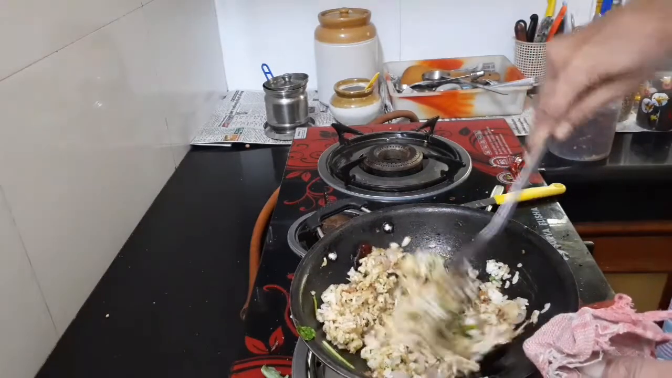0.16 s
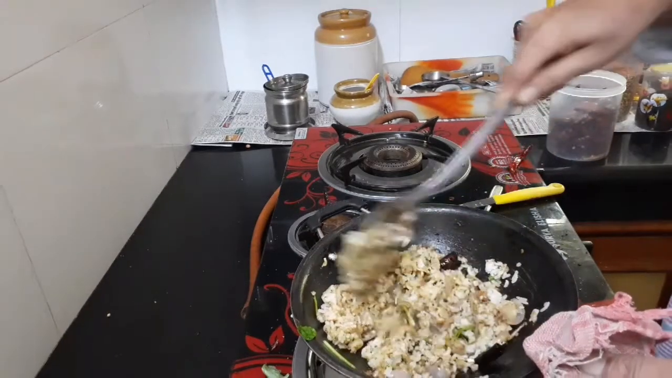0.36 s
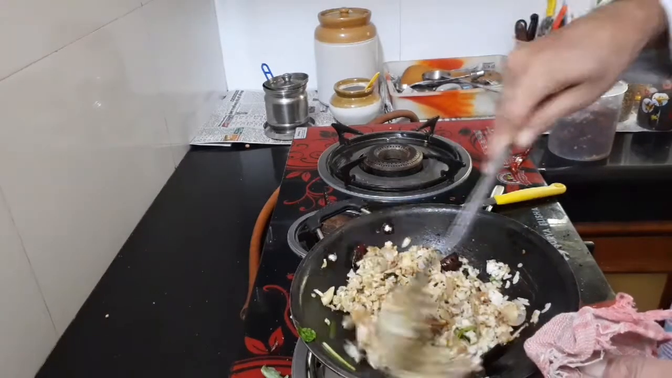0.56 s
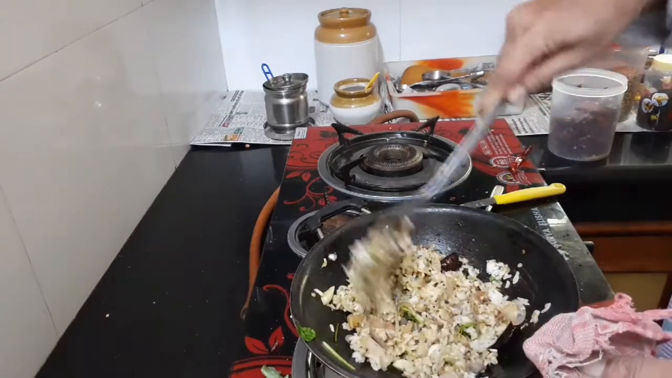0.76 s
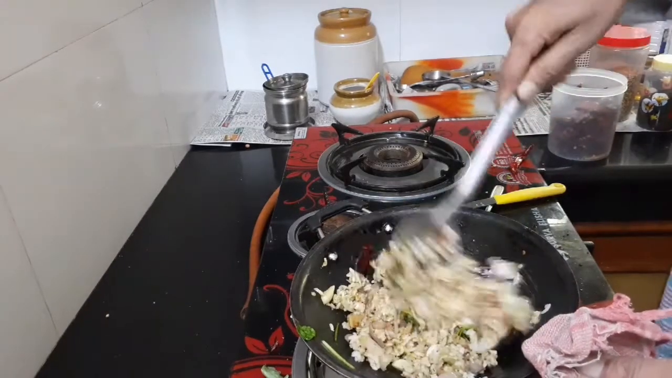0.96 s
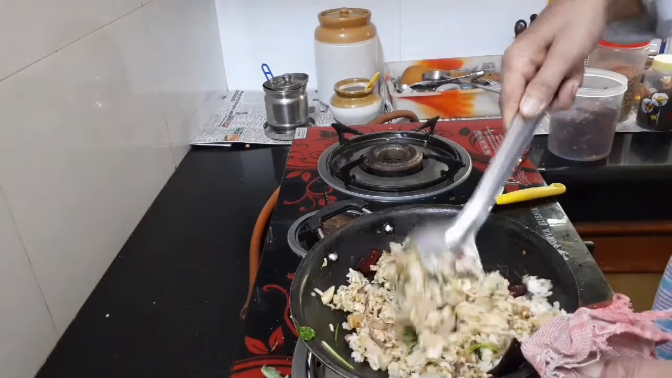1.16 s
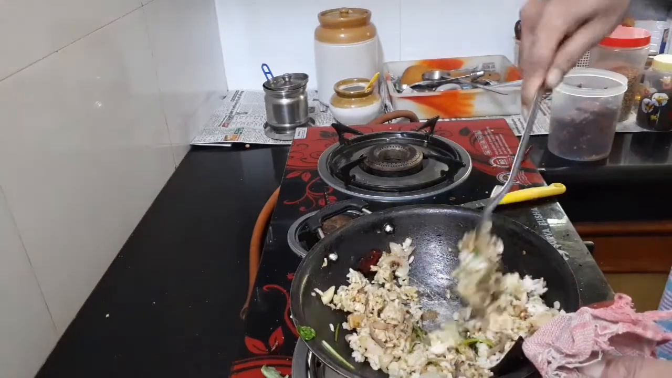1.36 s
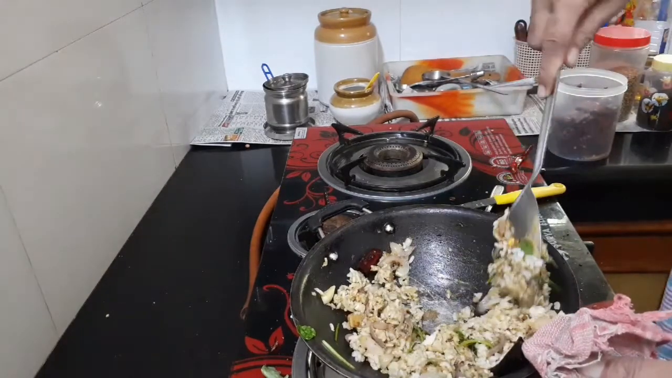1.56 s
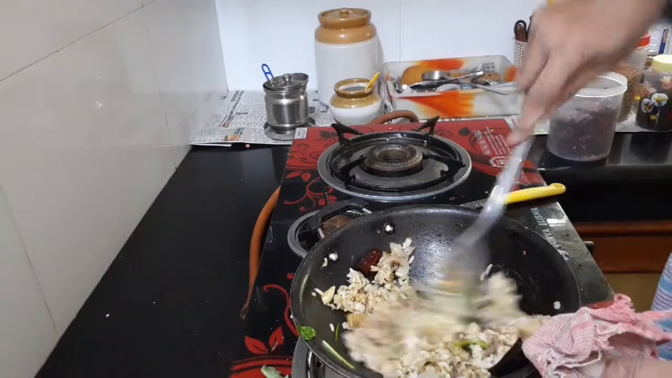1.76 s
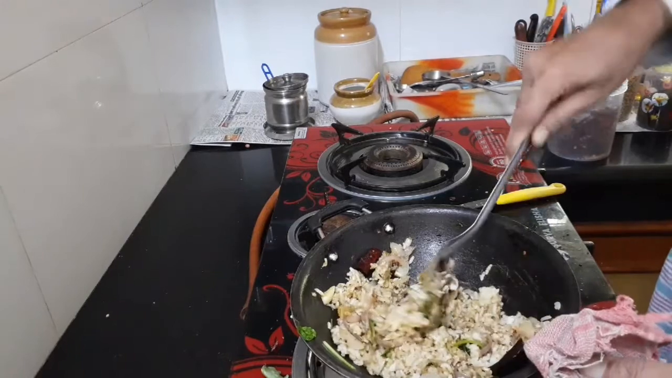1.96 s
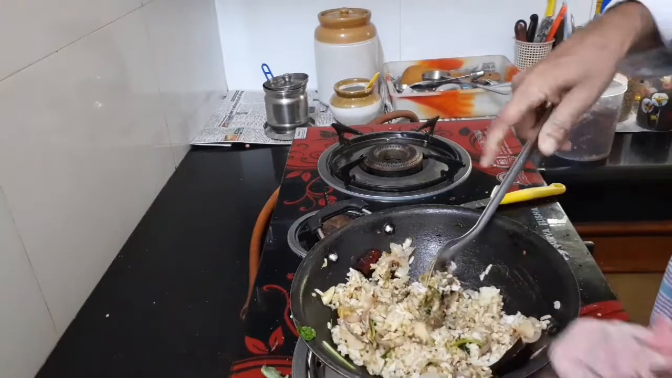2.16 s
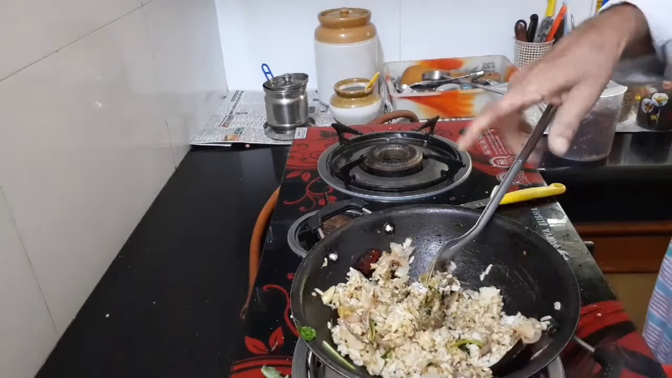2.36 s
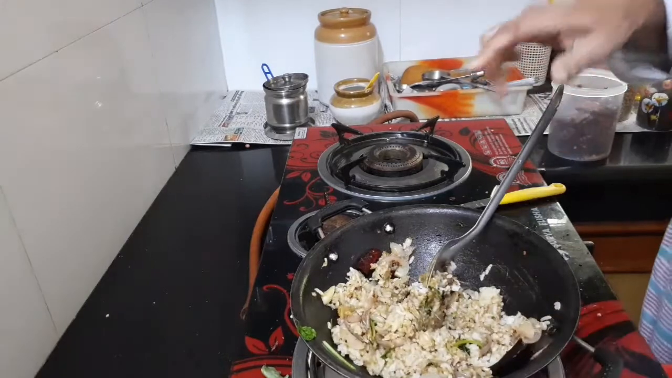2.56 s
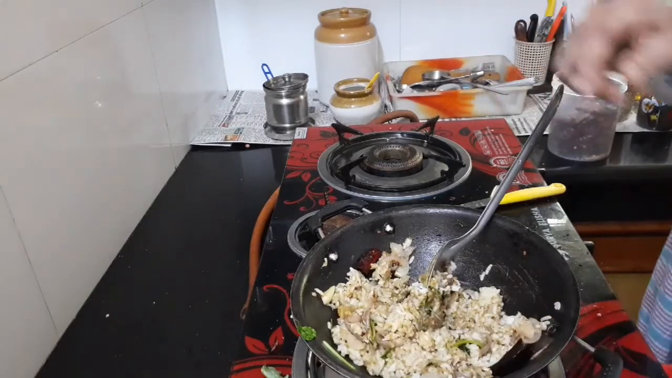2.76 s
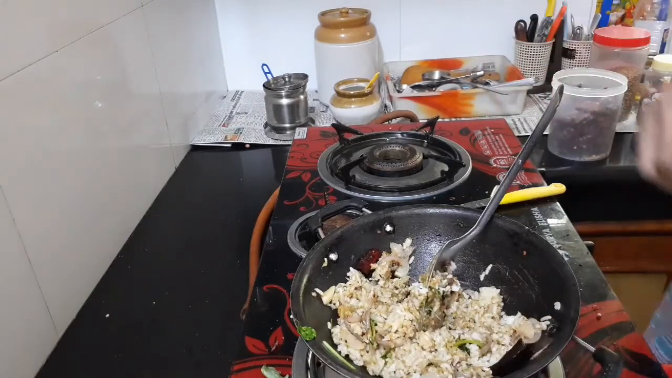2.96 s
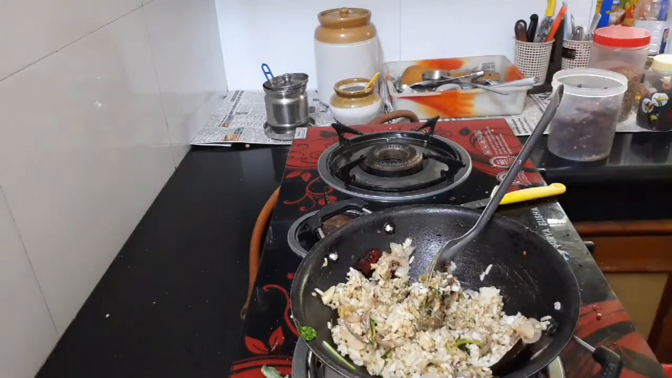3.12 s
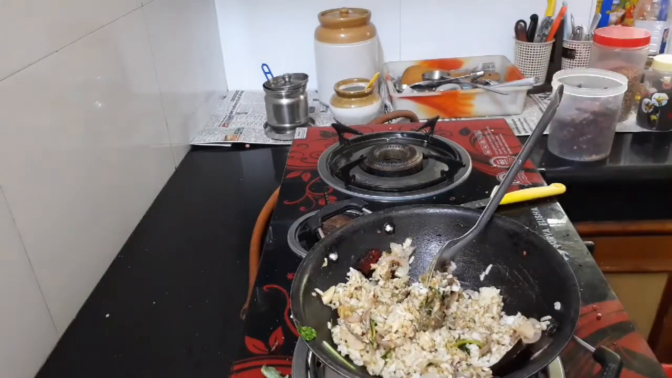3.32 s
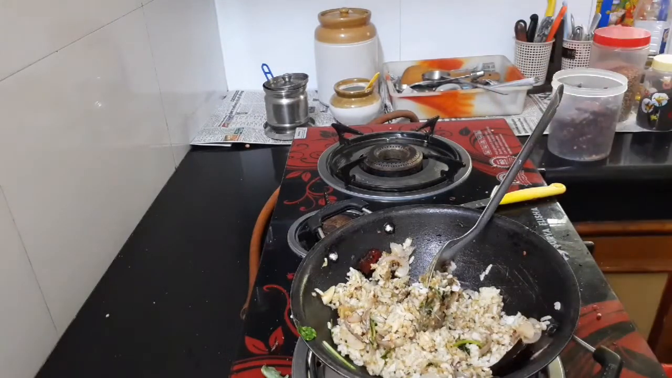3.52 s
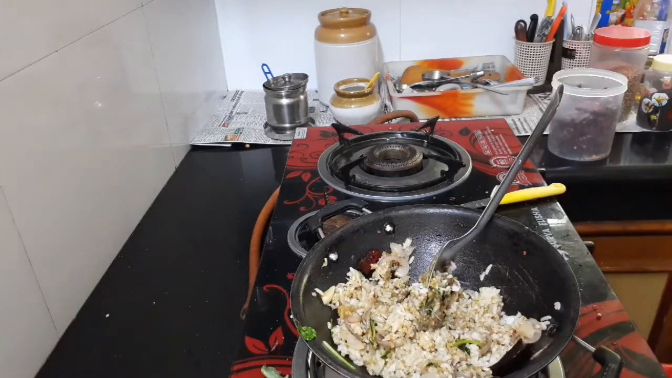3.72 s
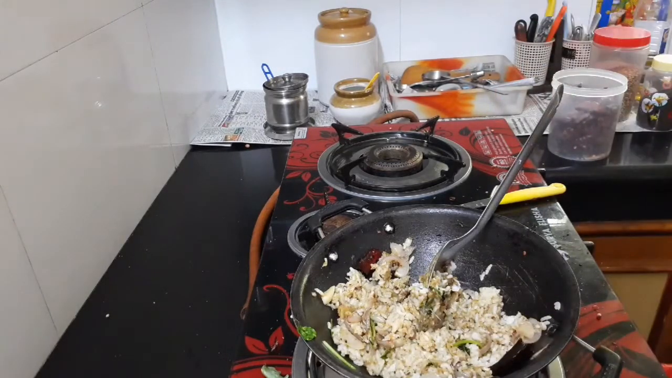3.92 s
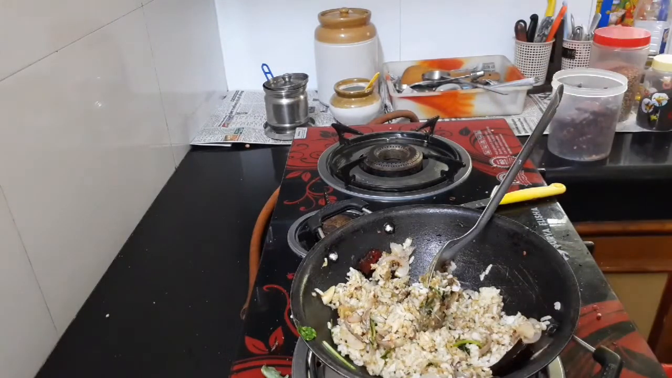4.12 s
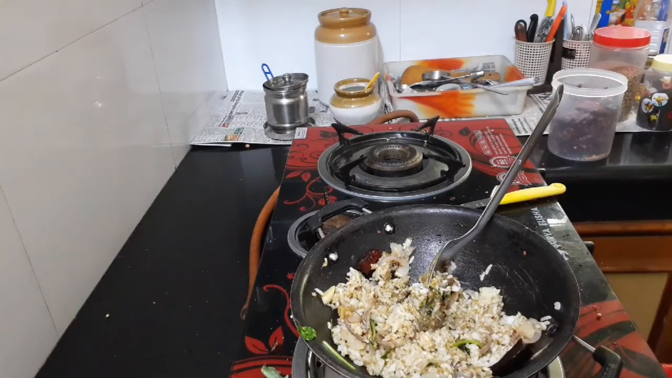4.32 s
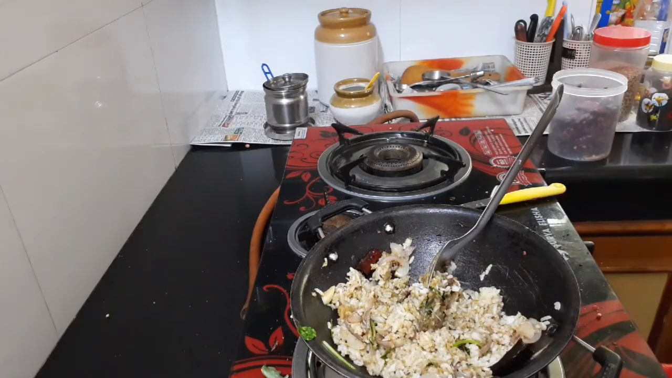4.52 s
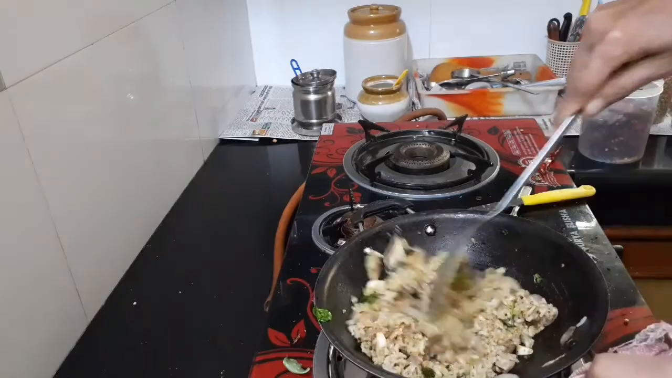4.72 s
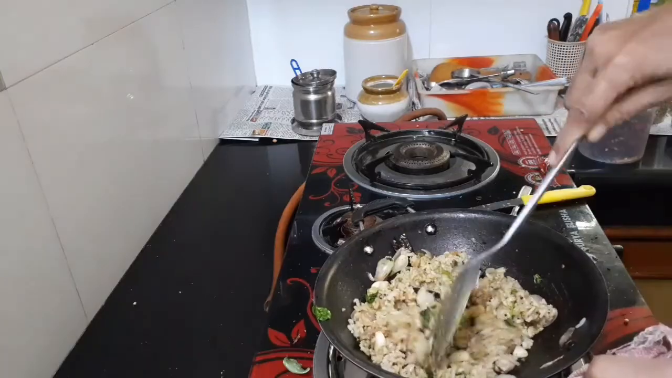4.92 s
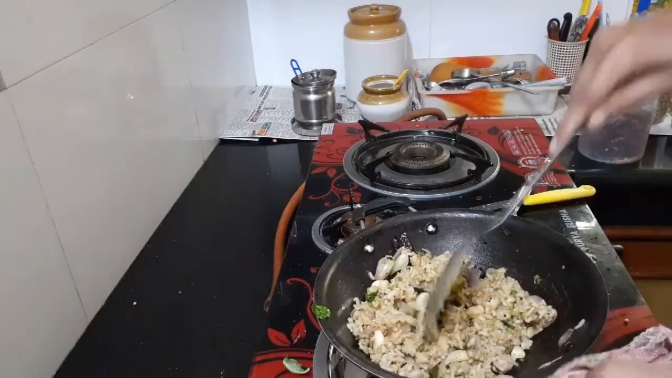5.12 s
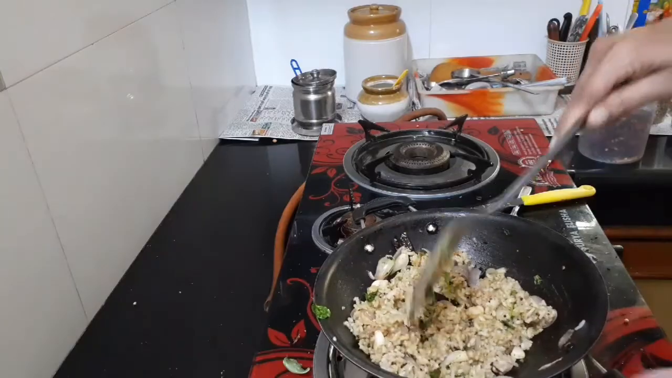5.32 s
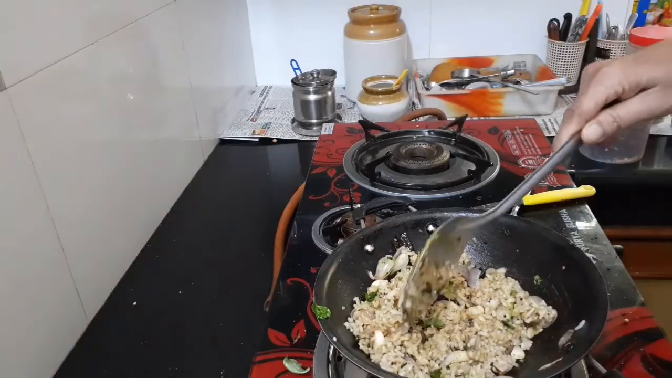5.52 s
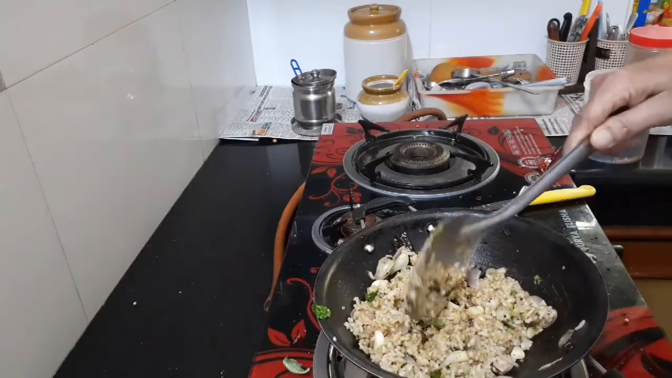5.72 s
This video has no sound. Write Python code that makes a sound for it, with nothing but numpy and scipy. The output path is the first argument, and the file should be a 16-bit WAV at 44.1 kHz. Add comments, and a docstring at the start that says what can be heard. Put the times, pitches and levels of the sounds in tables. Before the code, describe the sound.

In a small tiled kitchen, a steel ladle turns rice in a metal pan with dull knocks, short scrapes and squeaks over soft sizzling and a low flame. After about two seconds it rests; only spitting and hum remain, fading to silence. Then the sound cuts back in with stirring, a hard ringing clank, rim clinks and soft knocks. Close stereo microphones.

```python
"""Rice frying in a metal pan on a gas stove is turned with a steel ladle, in a small tiled kitchen.
First the ladle knocks, scrapes and squeaks: impacts excite damped modes, rubbing feeds them, stick-slip sings.
Throughout, bursting bubbles and droplets sizzle and spit as filtered noise, and the flame rumbles and hums.
The ladle then rests and the sound fades out; it cuts back in for more stirring, one hard clank,
two clinks of the handle on the rim and a few last soft knocks."""
import sys
import numpy as np
from scipy import signal
from scipy.fft import rfft, irfft
from scipy.io import wavfile
from scipy.ndimage import uniform_filter1d

SR = 44100
rng = np.random.default_rng(int(sys.argv[2]) if len(sys.argv) > 2 else 0)


def to_wav(s):
    """Save 16-bit WAV."""
    ch = np.atleast_2d(s).T  # columns
    pcm = np.round(np.clip(ch, -1, 1) * 32767)  # PCM
    wavfile.write(sys.argv[1], SR, pcm.astype(np.int16))


N = 259308
TIME = np.arange(N) / SR
RING = np.arange(SR // 2) / SR  # time axis of one short event [s]

# ladle meets pan, softer where rice cushions the blow: (time [s], level [dB], hardness [Hz])
KNOCKS = [(.001, -44.5, 720), (.601, -36, 1524), (.69, -42, 965), (0.842, -44, 1060), (.905, -36, 1730),
          (1.043, -43.5, 870), (1.163, -40.5, 1145), (1.355, -54, 1050), (1.539, -49.5, 463),
          (1.587, -37, 2610), (1.605, -41, 800), (1.65, -42.5, 930), (1.721, -39.5, 920),
          (1.771, -36, 2000), (1.849, -40.5, 775), (1.964, -36.5, 818), (1.979, -39.5, 700),
          (1.994, -42.5, 735), (2.082, -39.5, 1380), (2.172, -38.5, 1320), (2.2, -40.5, 960),
          (2.221, -49.5, 645), (2.295, -39, 820), (4.705, -41, 525), (4.939, -44.5, 900),
          (4.976, -17, 3900), (5.023, -30, 2000), (5.101, -33.5, 1380), (5.353, -37.5, 795),
          (5.366, -44, 640), (5.402, -42.5, 713), (5.429, -52, 524)]
# first arrivals of a blow, from the pan floor, its walls and the counter: (delay [s], gain [1])
FIRST_ARRIVALS = [(0, -0.99), (.0009, -1.4), (.0015, 1), (.0035, 1)]
# the pan's dense ring: (frequency [Hz], density [dB per Hz])
PAN_BODY = [(60, -48.5), (120, -17.5), (200, -20.5), (275, -7), (380, -2.5), (520, -0.5), (680, 0.5),
            (860, -6), (1050, -6.5), (1350, -13.5), (2000, -7.5), (3200, -13.5), (5500, -18), (9000, -2.5),
            (15000, -15.5)]
# how long the pan's dense ring and the room's tail last: (frequency [Hz], t60 [s])
RING_DECAY = [(150, 0.38), (550, 0.59), (1200, 0.68), (3400, 0.29), (4800, 0.35), (7000, 0.32),
              (15000, 0.11)]
# the pan's clear modes: (frequency [Hz], level [dB], t60 [s], phase lead of the left microphone [rad])
PAN_MODES = [(355, -15, .4, 0.5), (420, -8, .35, -1), (490, -3, 0.35, -1), (594, -6, 0.35, 1),
             (652, -8, .35, .5), (821, -7, 0.3, -1.8), (992, 5.5, 0.33, -1.4), (1094, -4, 0.3, -2.2),
             (1335, -3, 0.2, 2.8), (1405, -6, .25, -2.6), (1444, -4, 0.26, -2.6), (1504, -3, 0.25, -1.6),
             (1843, -8, 0.2, -1.8), (2212, -8, 0.15, -1)]
# the edge chatters on after a blow: (time [s], length [s], level [dB], hardness [Hz])
CHATTERS = [(1.178, 0.039, -63, 1100), (1.582, .02, -42.5, 3400), (1.775, 0.092, -41, 3200),
            (2.082, 0.021, -56, 2400), (2.168, 0.011, -51, 3600), (2.2, 0.011, -51.5, 2400),
            (2.317, 0.035, -68, 2200), (4.985, 0.073, -47, 2780), (5.11, 0.047, -45, 1900)]
# the ladle's handle clinks on the rim: (time [s], level [dB])
CLINKS = [(5.1932, -34.5), (5.201, -43)]
# the rim's brief ring: (frequency [Hz], level [dB], t60 [s], phase lead of the left microphone [rad])
RIM_MODES = [(1750, -10, .05, 0), (2640, -4, .08, .5), (3375, 0, .08, -.5), (3560, -6, .06, .5),
             (3984, -4, .08, 0), (4522, -5, .05, .5)]
# the hard tick at the rim: (frequency [Hz], density [dB per Hz])
RIM_TICK = [(600, -43), (1500, -2), (2900, -7), (3400, 2), (4600, -12), (5300, -28), (8000, -15),
            (9500, -19), (15000, -39)]
# the ladle's edge dragged over bare metal: (time [s], length [s], friction before trim [dB],
# frequency favoured by the point of contact [Hz], freedom of the ladle to ring [dB])
SCRAPES = [(0.559, 0.074, -26.5, 11000, 0), (1.769, 0.036, -28.5, 9000, -3)]
# the rasp of the scrapes: (frequency [Hz], density [dB per Hz])
SCRAPE_COLOUR = [(60, -12), (220, -13.5), (450, 3), (1100, -4), (3000, -5.5), (5000, -3.5), (7500, -3.5),
                 (9000, 4.5), (11000, -6), (13500, -2.5), (16000, -15)]
# the steel ladle's modes: (frequency [Hz], level [dB], t60 [s], phase lead of the left microphone [rad])
LADLE_MODES = [(1444, 1, .24, 1), (1527, -3, .25, -1), (2326, -2, 0.3, 1), (3068, -8, .2, 1),
               (4199, -9, .18, 0), (4952, -7, .16, -1), (5815, 1, 0.2, 1), (5902, -1.5, .18, -0.5),
               (6612, -3, .17, -1), (7200, -3, .2, 1), (8425, -5, .16, 1), (8613, -4, .17, 1.5),
               (8830, -1, 0.18, -1), (9168, -5, .16, 1.5), (9955, -4, .14, 1), (10338, 1, 0.18, 1),
               (10497, -3, .15, -1), (11423, -1, .16, 1), (12727, -1.5, .16, -0.5)]
# stick-slip tones: (time [s], length [s], pitch [Hz], level [dB], octave level [dB], slide [Hz],
# pitch jitter [share of pitch], ring-on t60 [s])
SQUEAKS = [(0.605, 0.026, 2340, -39.5, -34, 0, 0.003, .22), (0.668, 0.07, 2326, -45, -40, 2, .0005, .46),
           (1.062, 0.048, 618, -38.5, -23, 7, 0.016, .05), (1.096, 0.047, 583, -46.5, -13.5, -5, .015, .05),
           (1.77, 0.011, 1960, -33, -16, 60, 0.04, .05), (1.781, 0.019, 2150, -35, -10, 380, 0.075, .05),
           (1.799, 0.024, 1520, -39, -41, 3, 0.025, .06), (1.864, 0.024, 1520, -51, -28, 80, 0.05, .1),
           (4.98, 0.06, 494, -33, -1, 1, 0.008, .15), (4.978, 0.03, 1410, -33, -22, 40, 0.04, .25),
           (4.98, .025, 3500, -43, -30, 0, .03, .38), (5.098, 0.035, 575, -39.5, -1.5, 2, 0.014, .11),
           (5.149, 0.043, 569, -41.5, -12, 5, 0.022, .05)]
# the pushed pan rumbles on its grate: (time [s], length [s], level [dB])
RUMBLES = [(0.827, 0.4, -59), (4.694, 0.064, -51), (4.971, 0.01, -41.5), (5.097, 1, -57.5)]
# the rumble of the grate: (frequency [Hz], density [dB per Hz])
RUMBLE_COLOUR = [(30, -26), (70, -20.5), (120, -3), (200, -12), (400, -13), (900, -21.5)]
# a scoop of rice slides over the pan: (time [s], length [s], peak level [dB])
SLIDES = [(0.155, 0.14, -55), (0.933, 0.054, -45)]
# the rustle of sliding rice: (frequency [Hz], density [dB per Hz])
RUSTLE_COLOUR = [(500, -21), (1600, -6.5), (2500, 8), (4700, -1), (7000, -21.5), (15000, -21)]
# fresh rice lands on hot metal and the frying flares: (time [s], length [s], level before trim [dB])
TOSSES = [(0.096, 0.16, -51.5), (0.87, 0.26, -48), (1.542, 0.71, -58.5), (4.656, 0.14, -47),
          (5.097, 0.13, -54), (5.33, 0.66, -71)]
# the hiss of frying: (frequency [Hz], density [dB per Hz])
SIZZLE_COLOUR = [(530, -44), (900, -12.5), (1100, -14.5), (1720, -1), (2070, -1), (2330, 1), (3860, 1.5),
                 (4680, 1.5), (5750, -2), (7680, -4.5), (9200, 5.5), (12300, -0.5), (15200, -5.5),
                 (16000, -7)]
# large droplets of water and oil burst: (time [s], level before trim [dB], centre frequency [Hz])
SPITS = [(0.717, -40.5, 3960), (1.277, -51, 5370), (2.549, -43, 12000), (2.665, -52, 3500),
         (2.767, -45, 3750), (2.871, -56, 3320), (3.029, -52, 3460), (3.031, -46.5, 9100),
         (3.0695, -51, 3140), (3.231, -46.5, 3770), (3.2552, -54, 3560), (3.368, -43, 3680),
         (3.4554, -46, 10300), (3.6299, -45.5, 2100), (3.685, -58, 3012), (3.895, -46.5, 10400),
         (3.929, -56, 3600), (4.182, -44, 9700), (4.372, -51, 3550), (4.411, -50, 1980), (5.338, -51, 4110),
         (5.583, -52, 2640)]
# the rumble of the flame: (frequency [Hz], density [dB per Hz])
FLAME_COLOUR = [(25, -15.5), (50, -11), (115, 0.5), (190, -7.5), (300, 1), (410, 2), (600, -4), (760, -4.5),
                (950, -9.5), (1400, -14.5), (3000, -48)]
# pan resonances kept ringing by the flame: (frequency [Hz], width [Hz], level [dB])
HUM = [(283, 13, -74.5), (408, 8.7, -70.5), (515, 2.9, -62.5), (746, 10.6, -75.5)]
# likeness of the two microphones, held within -1 and 1: (frequency [Hz], left-right likeness [1])
LIKENESS = [(60, 1.17), (280, 0.57), (550, .5), (1000, -0.16), (1400, 0.22), (2000, 0.82), (4000, 0.25),
            (9000, 0)]
# balance of the two microphones: (frequency [Hz], left minus right [dB])
BALANCE = [(100, 6), (270, -1), (520, 0.5), (1000, 1.5), (4000, 0), (9000, 1.5), (14000, 3)]

RIGHT_LEADS_S = .00018  # the left sound of a blow lags by this, that of a squeak by half of it
JUDDER_S, JUDDER_LAW = 0.0082, 1.7  # drag time up to 1 kHz hardness; harder blows let go sooner
REBOUND_S, REBOUND_DB, REBOUND_DULLING = .021, -7, 0.45  # a second landing, softer and duller
REBOUND_LOSS_DB = 5  # a harder blow leaves less of itself to the second landing
CRACK_RISE_DB = 3  # extra crack of a harder blow
PRESSED_DB_PER_S = 495  # a chattering edge stays on the pan and damps it
CATCH_DB, CATCH_S = -8, 0.002  # the edge catches sharply as it lands
BITE_DB, PRESS_SHARE, EASE_DB = -11.5, 0.71, -14.5  # bite, share of length at the hardest press, ease
SKID_DB, SKID_DB_PER_S = -15.5, 105  # the lifted edge skids on and dies away
RUMBLE_RELEASE_S = 0.065
SIMMER_DB = -58.5  # the frying of rice left alone, before trim
FLARE_RISE_S, FLARE_FALL_S = 0.089, 0.046
DAMP_DB, DRYING_S = -12.5, 7.8  # part of each flare lingers while the turned rice dries
LULL_S, LULL_WIDTH_S, LULL_DB = 1.35, 0.22, -4  # frying sinks while rice is pushed off the hot spot
SMALL_SPITS_PER_S = 11  # roughly
SMALL_SPIT_DB, SMALL_SPIT_SPREAD_DB = -56, 3  # before trim
SMALL_SPIT_HZ, SMALL_SPIT_OCTAVES = 4800, 1
FLAME_DB = -63
FADE_START_S, FADE_END_S, FADE_POWER, CUT_IN_S = 3.42, 4.7, 1.06, 4.701
EDGE_HZ = 15900  # upper band limit


def knocks(slips_per_s=800, slip_size=0.89):
    """Impact excitation: each blow strikes the pan once, then judders in brief, dying slips."""
    out = np.zeros((2, N))
    for s, db, hard_hz in contacts():
        drag_s = JUDDER_S * np.exp(-JUDDER_LAW * max(np.log(hard_hz / 1000), 0))
        slips = rng.choice([-1, 1], len(RING)) * (rng.random(len(RING)) < slips_per_s / SR)
        shortness = min(drag_s / 0.0094, 1)  # a shorter drag slips more weakly
        judder = slip_size * shortness * slips * np.exp(-RING / drag_s)
        judder[0] = 1  # the first contact is the firmest
        add(out, s, peaked(convolve(pan(hard_hz), judder), db, size=300))
    return out


def contacts():
    """Rebound: every knock is followed by a second landing, as (time [s], level [dB], hardness [Hz])."""
    for s, db, hard_hz in KNOCKS:
        yield s, db, hard_hz
        loss_db = REBOUND_LOSS_DB * max(np.log(hard_hz / 1000), 0)
        yield s + REBOUND_S, db + REBOUND_DB - loss_db, hard_hz * REBOUND_DULLING


def pan(hard_hz, crack_db=-8, modes_db=-44, ring_rise_db=4, bass_share=0.125, early_db=-2, early_s=0.028):
    """Impulse response of the pan: a crack, a dense ring and clear modes, dulled by a longer contact."""
    crack = np.zeros((2, len(RING)))
    for s, gain in FIRST_ARRIVALS:
        add(crack[:1], s + RIGHT_LEADS_S, np.array([[gain]]))
        add(crack[1:], s, np.array([[gain]]))
    bare = np.log(hard_hz / 1000)  # bare metal cracks harder and rings more clearly
    early = 1 + amp(early_db) * np.exp(-RING / early_s)  # strong first swings, then the rice soaks them up
    dense = early * tail(RING_DECAY)
    blow = colour(dense + amp(crack_db + CRACK_RISE_DB * bare) * crack, PAN_BODY)
    blow += amp(modes_db + ring_rise_db * bare) * ring(PAN_MODES)
    soft = np.exp(-2 * np.pi * hard_hz / SR)  # a longer contact leaves less treble
    blow = signal.lfilter([1], np.poly([soft, soft]), blow)
    # a sharp blow barely moves the whole pan
    return signal.lfilter(*signal.butter(2, bass_share * hard_hz, "high", fs=SR), blow)


def ring(modes):
    """Modal superposition: damped sines, each reaching the two microphones with its own lag."""
    hz, db, t60, lead = np.transpose(modes)[:, :, None]
    angle = 2 * np.pi * (hz * RING + rng.random(hz.shape))
    dying = amp(db - 60 * RING / t60)
    return np.array([(dying * np.sin(angle + side * lead)).sum(0) for side in (.5, -.5)])


def chatters(skips_per_s=260, spread_db=4, loosen_db=-8, top_hz=4200, lowest_hz=1400):
    """Repeated impact: the edge skips over crusted metal in a quick, uneven run of weakening taps."""
    out = np.zeros((2, N))
    band = signal.butter(2, [lowest_hz, top_hz], "band", fs=SR)
    for s, length, db, hard_hz in CHATTERS:
        chance, size = rng.random(len(RING)), rng.standard_normal(len(RING))
        happens = (chance < skips_per_s / SR) * (RING < length)
        taps = happens * np.sign(size) * amp(spread_db * abs(size) + loosen_db * RING / length)
        taps[0] = 1
        pressed = pan(hard_hz) * amp(-PRESSED_DB_PER_S * RING)
        run = signal.lfilter(*band, convolve(pressed, taps))
        add(out, s, peaked(run, db, size=300))
    return out


def clinks(tick_s=0.0018, ring_db=-19, wet_db=-5):
    """Hard impact: the handle taps the rim and bounces, each time a tick and a short, bright modal ring."""
    out = np.zeros((2, N))
    for s, db in CLINKS:
        tick = colour(diffuse(len(RING)) * np.exp(-RING / tick_s), RIM_TICK)
        clink = kitchen(tick + amp(ring_db) * ring(RIM_MODES), wet_db)
        add(out, s, peaked(clink, db, size=100))
    return out


def scrapes(slips_per_s=3000, grit_db=4, ladle_db=-17, steel_t60=0.02,
            focus_db=-3, focus_octaves=0.095, trim_db=-1.5):
    """Friction noise: a rush of tiny slips rasps through the steel and sets the ladle's modes ringing."""
    out, rubbing = np.zeros((2, N)), np.zeros(N)
    for s, length, db, focus_hz, free_db in SCRAPES:
        sizes = rng.standard_normal(N) * amp(grit_db * rng.standard_normal(N))
        slips = evened(sizes * (rng.random(N) < slips_per_s / SR))
        focus = signal.lfilter(*around(focus_hz, focus_octaves, order=1), slips)
        drive = stroke(s, length, db) * (slips + amp(focus_db) * focus)
        steel = diffuse(len(RING)) * amp(-60 * RING / steel_t60)
        rasp = convolve(colour(drive, SCRAPE_COLOUR), steel / np.linalg.norm(steel[0]))
        out += amp(trim_db) * kitchen(rasp, wet_db=-2.0)
        rubbing += amp(free_db) * drive
    return out + amp(ladle_db) * rung(rubbing, LADLE_MODES)


def stroke(s, length, db):
    """Friction follows the pressing force over one scrape: catch, bite, press, ease, skid."""
    press_db = np.interp((TIME - s) / length, [0, PRESS_SHARE, 1], [BITE_DB, 0, EASE_DB])
    skid_db = SKID_DB - SKID_DB_PER_S * since(s + length)
    catch = amp(CATCH_DB) * np.exp(-since(s) / CATCH_S)
    return (TIME >= s) * amp(db) * (catch + amp(np.where(TIME < s + length, press_db, skid_db)))


def rung(drive, modes):
    """Random excitation: each mode stores the drive's energy and loses it at its own speed; phase wanders."""
    out = np.zeros((2, N))
    for hz, db, t60, lead in modes:
        keep = amp(-60 / (t60 * SR)) ** 2  # share of energy left after one sample
        energy = signal.lfilter([1 - keep], [1, -keep], drive ** 2 + 1e-20)
        strength = amp(db) * np.sqrt(energy)
        angle = np.cumsum(2 * np.pi * hz / SR + np.sqrt(1 - keep) * rng.standard_normal(N))
        out += strength * np.sin([angle + lead / 2, angle - lead / 2])
    return out


def squeaks(flutter_db=2, lock_s=0.025, lowest_hz=250):
    """Stick-slip oscillation: a brief tone slides and rings on; uneven grip smears it into a screech."""
    out = np.zeros((2, N))
    for s, length, hz, db, octave_db, slide_hz, jitter, t60 in SQUEAKS:
        wobble = evened(uniform_filter1d(rng.standard_normal(len(RING)), size=50))
        grip = evened(uniform_filter1d(rng.standard_normal(len(RING)), size=200))
        grip *= min(lock_s / length, 1)  # a longer squeak flutters less
        along = np.minimum(RING / length, 1)
        angle = 2 * np.pi * np.cumsum(hz * (1 + jitter * wobble) + slide_hz * along) / SR
        # the swell never falls faster than the ring-on allows
        fall = np.log(1000) * RING / t60
        swell = np.exp(np.maximum.accumulate(np.log(np.sin(np.pi * along) + 1e-9) + fall) - fall)
        wave = np.sin(angle) + amp(octave_db) * np.sin(2 * angle)
        tone = np.sqrt(2) * amp(db + flutter_db * grip) * swell * wave
        add(out[:1], s + RIGHT_LEADS_S / 2, tone[None])
        add(out[1:], s, tone[None])
    return kitchen(signal.lfilter(*signal.butter(2, lowest_hz, "high", fs=SR), out), wet_db=-9)


def grate():
    """Forced vibration: the pan rumbles on its grate while the ladle pushes it, then dies away."""
    push = np.zeros(N)
    for s, length, db in RUMBLES:
        push += (TIME >= s) * amp(db) * np.exp(-since(s + length) / RUMBLE_RELEASE_S)
    return push * evened(colour(diffuse(N), RUMBLE_COLOUR))


def rustle(grains_per_s=2500, wet_db=-2):
    """Granular impact noise: sliding rice ticks on the metal, swelling and ebbing with each scoop."""
    speed = np.zeros(N)
    for s, length, db in SLIDES:
        speed += amp(db) * np.sin(np.pi * np.minimum(since(s) / length, 1))
    grains = rng.standard_normal((2, N)) * (rng.random(N) < grains_per_s / SR)
    return kitchen(speed * evened(colour(grains, RUSTLE_COLOUR)), wet_db)


def sizzle(bubbles_per_s=1500, spread_db=4, crackle_db=-4, trim_db=1):
    """Superposed random pulses: tiny steam bubbles merge into a hiss, larger ones crackle through it."""
    sizes = amp(spread_db * np.minimum(rng.exponential(1, N), 4)) * (rng.random(N) < bubbles_per_s / SR)
    crackle = evened(kitchen(sizes * rng.standard_normal((2, N)), wet_db=-1))
    frying = evened(colour(diffuse(N) + amp(crackle_db) * crackle, SIZZLE_COLOUR))
    # independent sources add in power
    strength = np.sqrt(amp(SIMMER_DB) ** 2 + sum(flare(*row) ** 2 for row in TOSSES))
    lull_db = LULL_DB * np.exp(-((TIME - LULL_S) / LULL_WIDTH_S) ** 2)
    return amp(trim_db + lull_db) * strength * frying


def flare(s, length, db):
    """Two-rate decay: the frying of one toss swells, holds, drops back and slowly dries."""
    after = since(s + length)
    fall = np.maximum(np.exp(-after / FLARE_FALL_S), amp(DAMP_DB) * np.exp(-after / DRYING_S))
    return amp(db) * np.minimum(since(s) / FLARE_RISE_S, 1) * fall


def spits(burst_s=0.0006, width_octaves=0.9, trim_db=2):
    """Transient radiation: single droplets burst with a short tick of band-limited noise."""
    out = np.zeros((2, N))
    for s, db, hz in SPITS + small_spits():
        burst = kitchen(diffuse(len(RING)) * np.exp(-RING / burst_s), wet_db=-2)
        tick = signal.lfilter(*around(hz, width_octaves, order=3), burst)
        add(out, s, peaked(tick, db + trim_db, size=100))
    return out


def small_spits():
    """Random process: droplets burst by chance, as (time [s], level before trim [dB], centre [Hz])."""
    draws = rng.uniform(-1.1, 1, (round(SMALL_SPITS_PER_S * N / SR), 3))
    return [(abs(when) * N / SR,
             SMALL_SPIT_DB + SMALL_SPIT_SPREAD_DB * size,
             SMALL_SPIT_HZ * 2 ** (SMALL_SPIT_OCTAVES * pitch)) for when, size, pitch in draws]


def burner(waver=0.09):
    """Turbulent noise and sustained resonance: the flame rumbles and keeps the pan humming."""
    out = amp(FLAME_DB) * evened(colour(diffuse(N), FLAME_COLOUR))
    offset = np.fft.fftfreq(N, 1 / SR)
    for hz, width, db in HUM:
        slow = np.fft.fft(rng.standard_normal(N)) * np.exp(-(offset / width) ** 2)
        drift = evened(np.fft.ifft(slow).real)
        detune_hz = width * np.roll(drift, SR) / 2  # shifted by 1 s, so pitch and level wander apart
        angle = 2 * np.pi * np.cumsum(hz + detune_hz) / SR
        out += np.sqrt(2) * amp(db) * (1 + waver * drift) * np.sin(angle)
    return out


def kitchen(x, wet_db):
    """Reverberation: direct sound plus the tiled room's tail, weighted to keep the power."""
    return (x + amp(wet_db) * convolve(x, tail(RING_DECAY))) / np.hypot(1, amp(wet_db))


def tail(decay):
    """Frequency-dependent absorption: dense reflections, each band dying at its own speed; unit energy."""
    hz, t, z = signal.stft(diffuse(len(RING)), SR, nperseg=256)
    dying = z * amp(-60 * t / read(decay, hz)[:, None])
    out = signal.istft(dying, SR, nperseg=256)[1][:, :len(RING)]
    return evened(out) / np.sqrt(len(RING))


def diffuse(size):
    """Spatial coherence of a diffuse field: white noise in two microphones, alike as LIKENESS says."""
    a, b = rfft(rng.standard_normal((2, size)))
    same = np.clip(read(LIKENESS, np.fft.rfftfreq(size, 1 / SR)), -1, 1)
    return irfft(np.array([a, same * a + np.sqrt(1 - same ** 2) * b]), size)


def colour(x, spectrum, size=4096):
    """Minimum-phase filtering: a causal response of unit energy shaped like the given spectrum."""
    log_gain = np.log(amp(read(spectrum, abs(np.fft.fftfreq(size, 1 / SR)))))
    taps = np.fft.ifft(np.exp(np.conj(signal.hilbert(log_gain)))).real[:size // 2]
    return convolve(x, taps / np.linalg.norm(taps))


def around(hz, octaves, order):
    """Constant relative bandwidth: a band-pass filter centred on hz in octaves."""
    band = np.clip(hz * 2 ** (np.array([-.5, .5]) * octaves), 1, SR / 2 - 1)
    return signal.butter(order, band, "band", fs=SR)


def convolve(x, response):
    """Linear superposition: convolves along time and keeps the length."""
    return signal.fftconvolve(np.atleast_2d(x), np.atleast_2d(response), axes=1)[:, :x.shape[-1]]


def peaked(x, db, size):
    """Short-time level: scales a blow so that its loudest stretch of `size` samples has the given rms."""
    return x * amp(db) / np.sqrt(uniform_filter1d((x ** 2).mean(0), size).max())


def evened(x):
    """Normalization: scales to an rms of one."""
    return x / np.sqrt(np.mean(x ** 2) + 1e-20)


def amp(db):
    """Logarithmic level: decibels to gain."""
    return 10 ** (np.asarray(db) / 20)


def read(points, hz):
    """Logarithmic frequency: interpolates a table on a log-frequency axis."""
    f, value = np.transpose(points)
    return np.interp(np.log(hz + 1), np.log(f + 1), value)


def since(s):
    """Elapsed time: seconds gone by since time s, zero before it."""
    return np.maximum(TIME - s, 0)


def add(mix, s, sound):
    """Superposition: mixes a sound in at time s, in place."""
    part = mix[:, max(round(s * SR), 0):][:, :sound.shape[1]]
    part += sound[:, :part.shape[1]]


def scene():
    """Superposition of ladle, rice and stove."""
    ladle = knocks() + chatters() + clinks() + scrapes() + squeaks()
    return ladle + grate() + rustle() + sizzle() + spits() + burner()


def fade():
    """Gain envelope: slides to silence and jumps back, the jump smoothed over 256 samples."""
    left = np.clip((FADE_END_S - TIME) / (FADE_END_S - FADE_START_S), 0, 1)
    return uniform_filter1d(np.where(TIME < CUT_IN_S, left ** FADE_POWER, 1), size=256)


def record(dry):
    """Linear transfer: the two microphones' balance, the fade and cut-in, and the band limit."""
    lean_db = read(BALANCE, np.fft.rfftfreq(N, 1 / SR)) / 2
    heard = irfft(rfft(dry) * amp([lean_db, -lean_db]), N) * fade()
    low_pass = signal.firwin(511, EDGE_HZ, window=("kaiser", 9), fs=SR)
    return signal.oaconvolve(heard, low_pass[None], "same")


dry = scene()
out = record(dry)
to_wav(out)
```